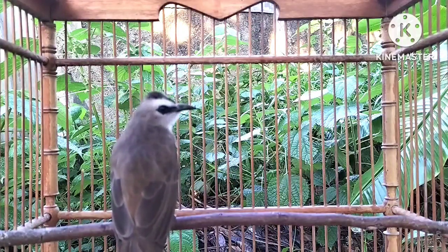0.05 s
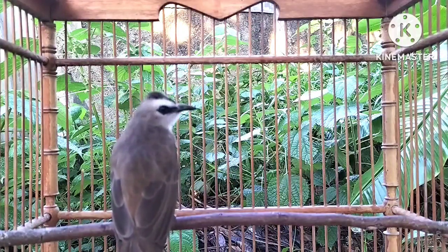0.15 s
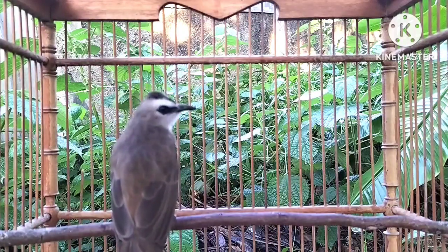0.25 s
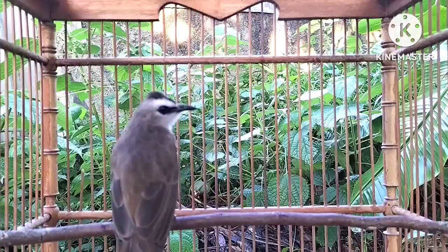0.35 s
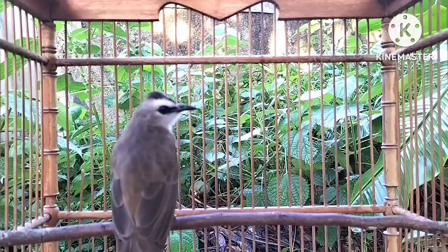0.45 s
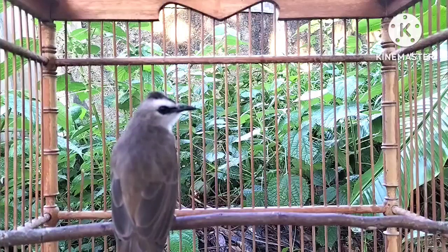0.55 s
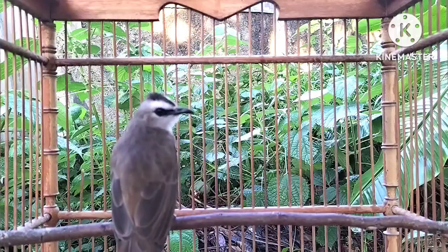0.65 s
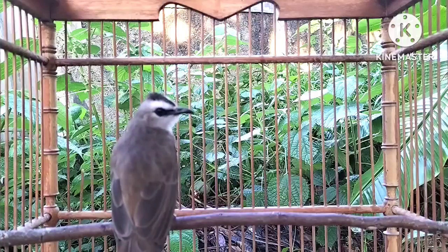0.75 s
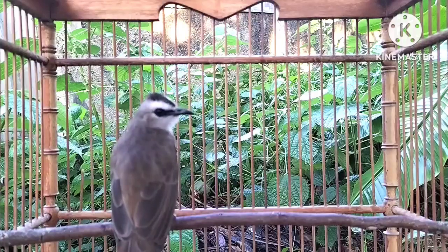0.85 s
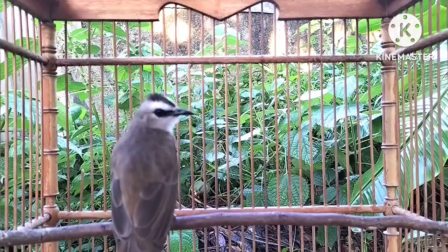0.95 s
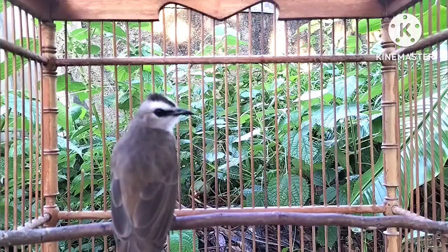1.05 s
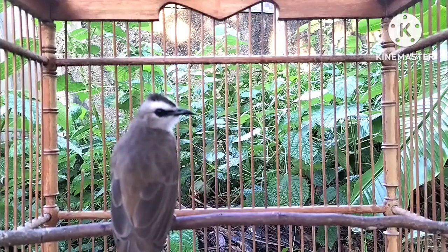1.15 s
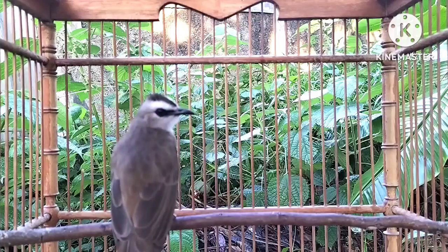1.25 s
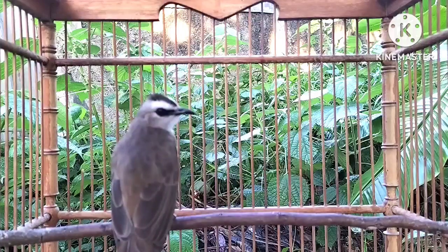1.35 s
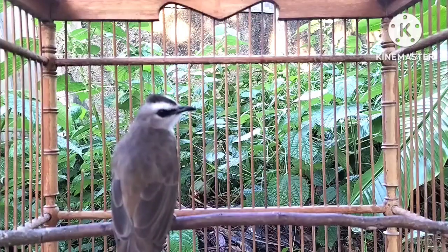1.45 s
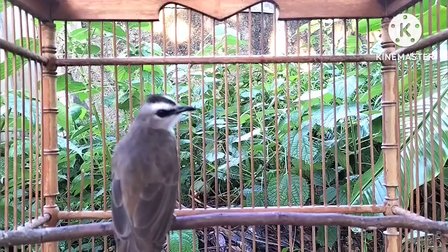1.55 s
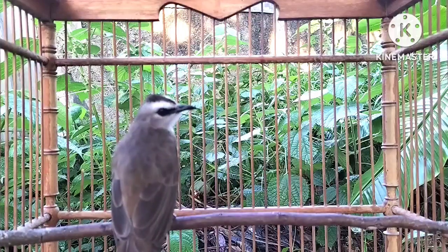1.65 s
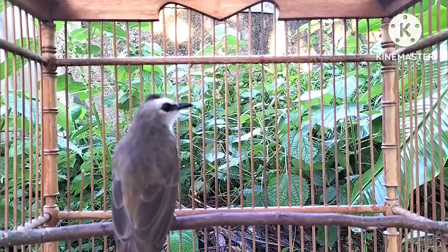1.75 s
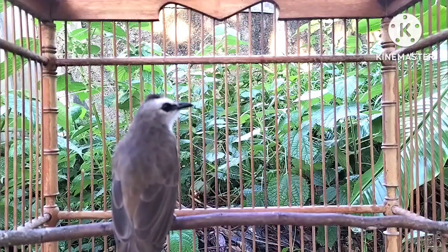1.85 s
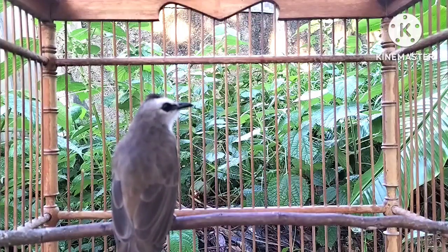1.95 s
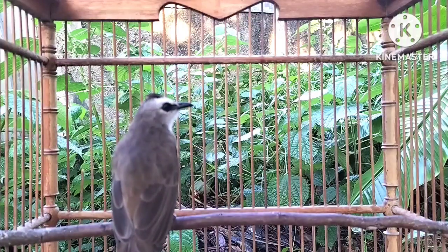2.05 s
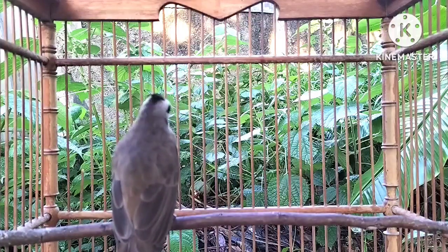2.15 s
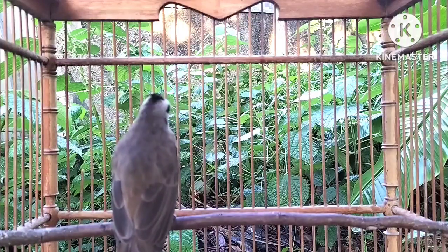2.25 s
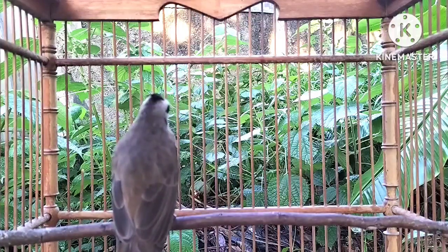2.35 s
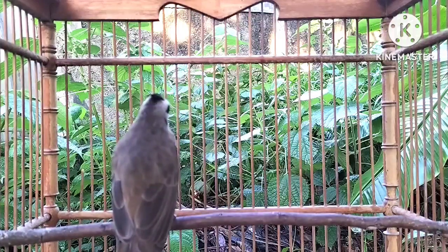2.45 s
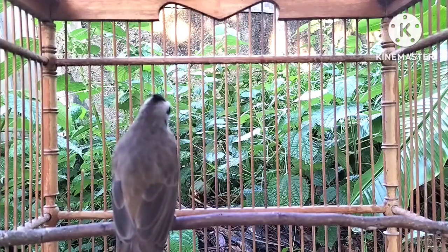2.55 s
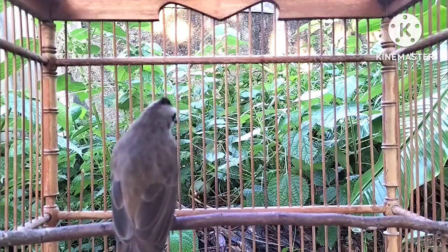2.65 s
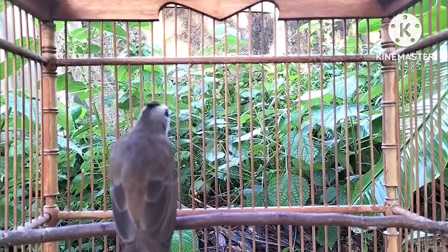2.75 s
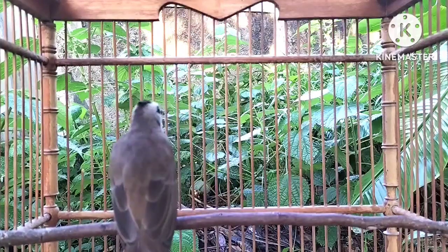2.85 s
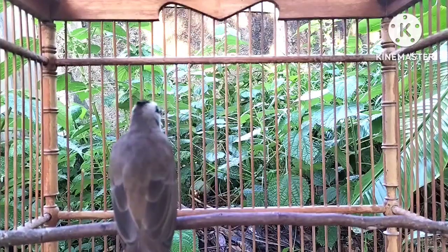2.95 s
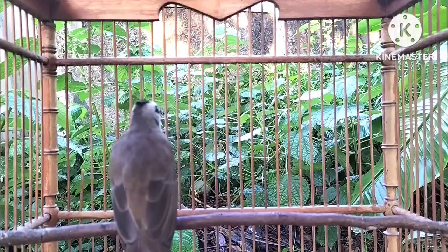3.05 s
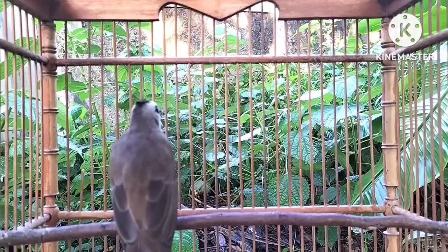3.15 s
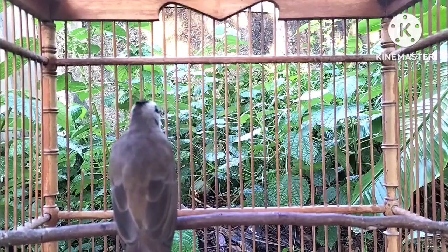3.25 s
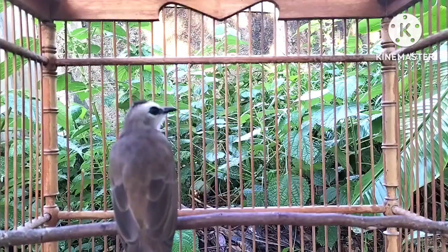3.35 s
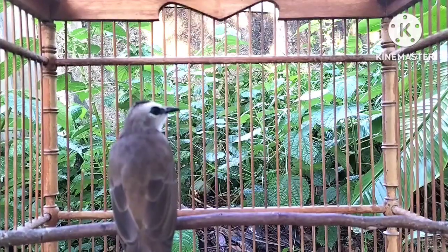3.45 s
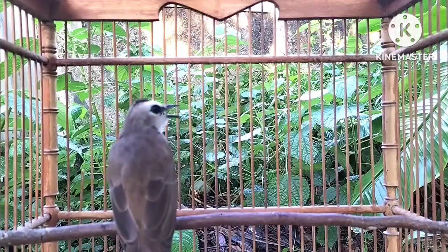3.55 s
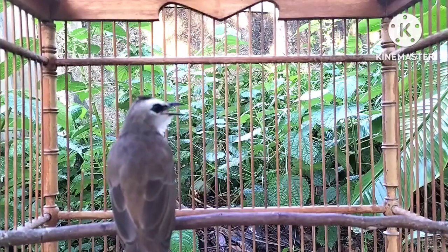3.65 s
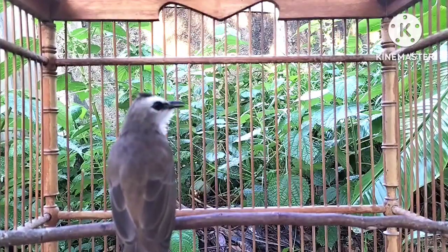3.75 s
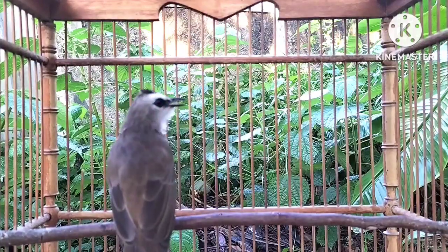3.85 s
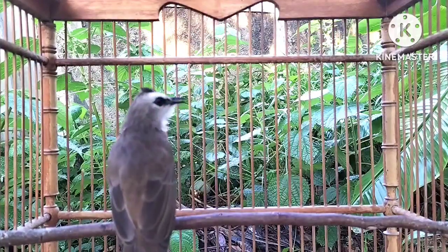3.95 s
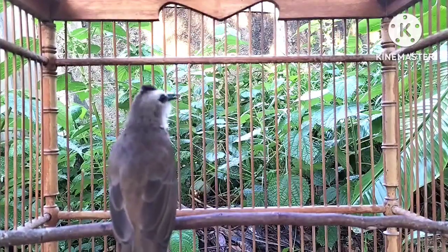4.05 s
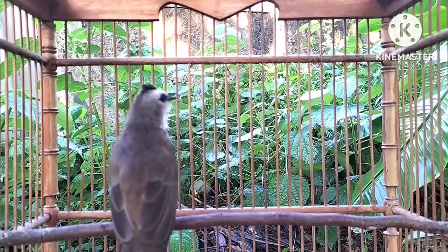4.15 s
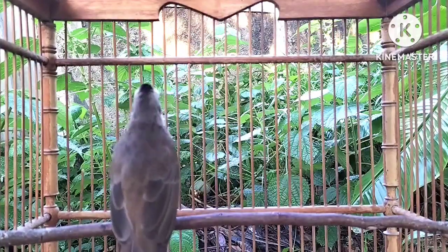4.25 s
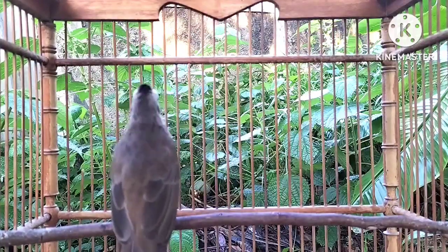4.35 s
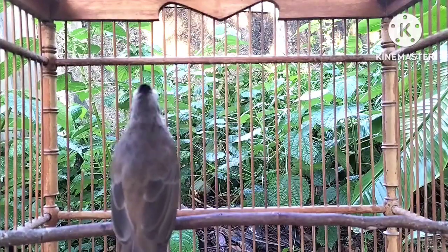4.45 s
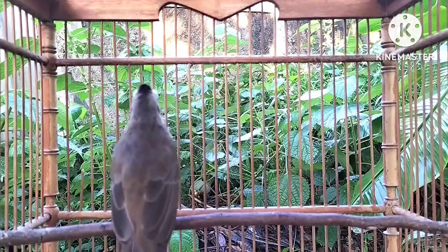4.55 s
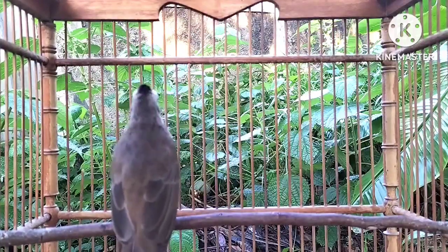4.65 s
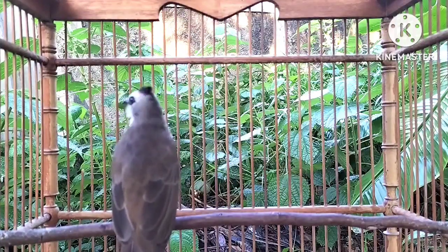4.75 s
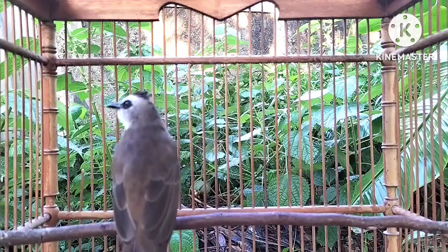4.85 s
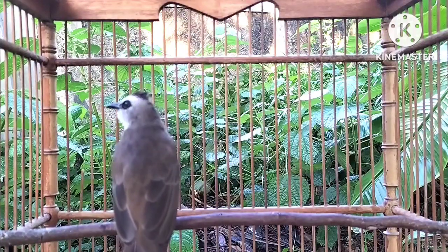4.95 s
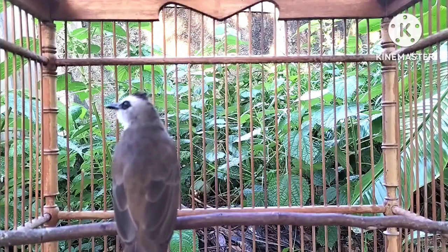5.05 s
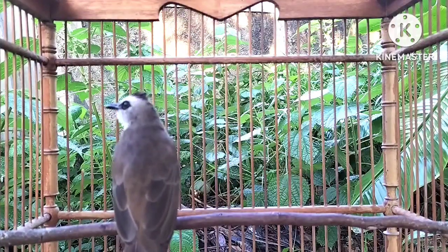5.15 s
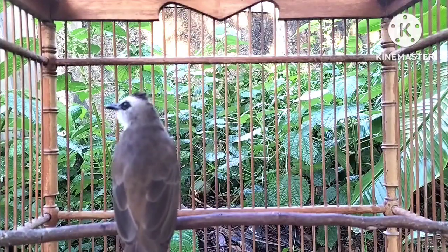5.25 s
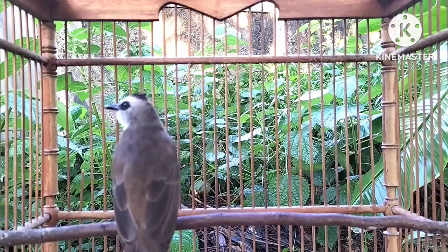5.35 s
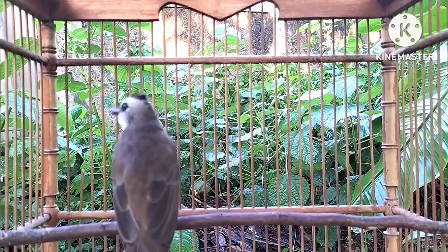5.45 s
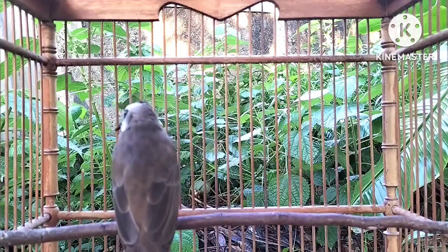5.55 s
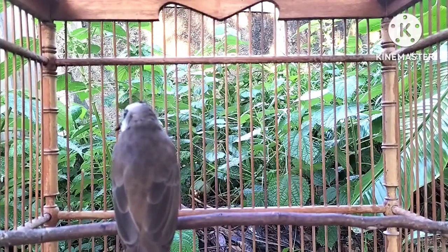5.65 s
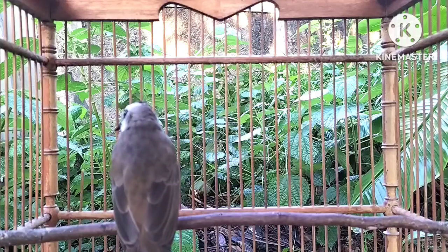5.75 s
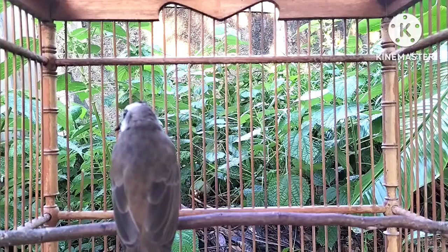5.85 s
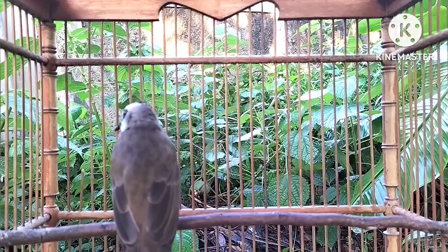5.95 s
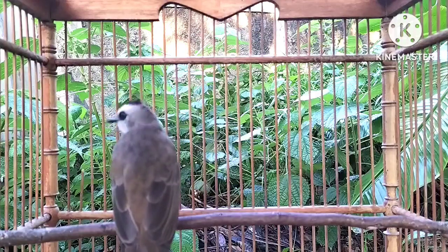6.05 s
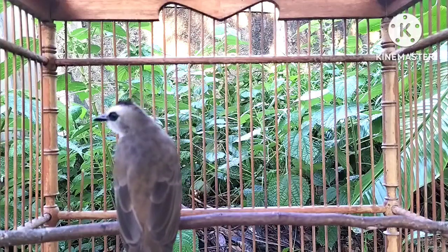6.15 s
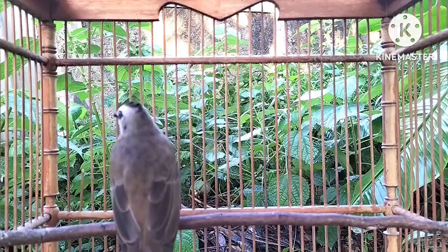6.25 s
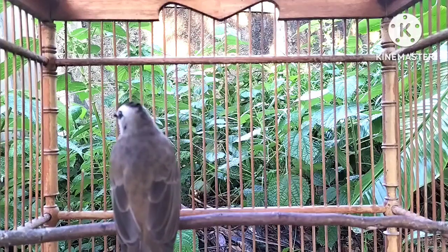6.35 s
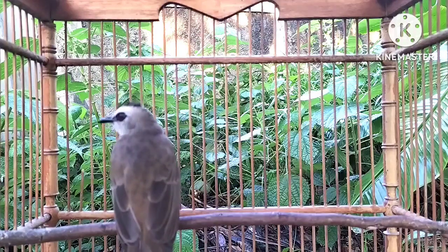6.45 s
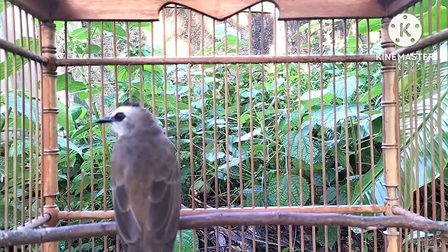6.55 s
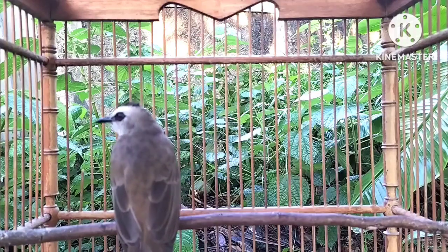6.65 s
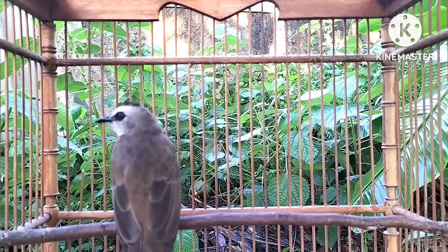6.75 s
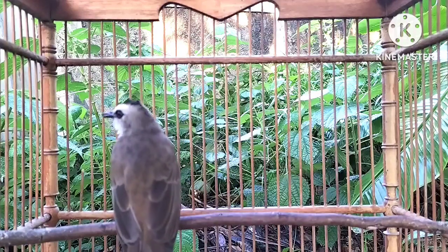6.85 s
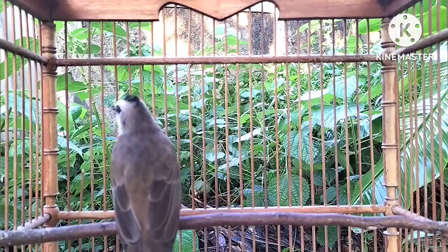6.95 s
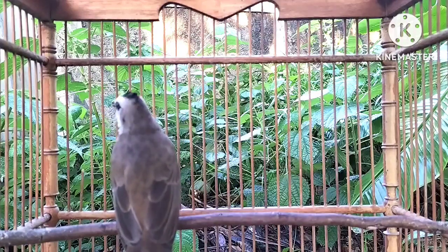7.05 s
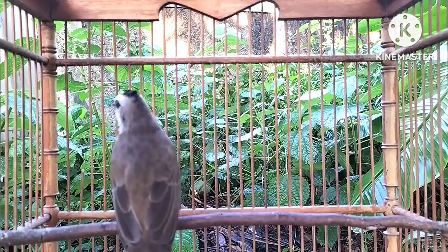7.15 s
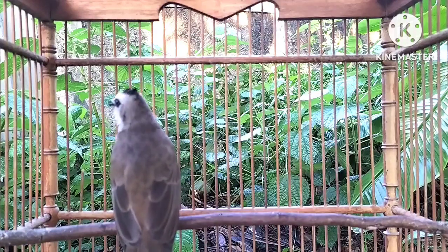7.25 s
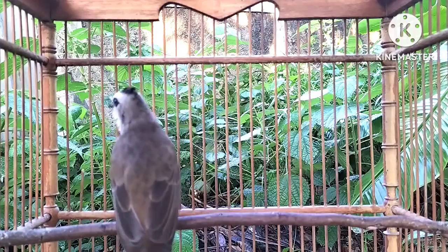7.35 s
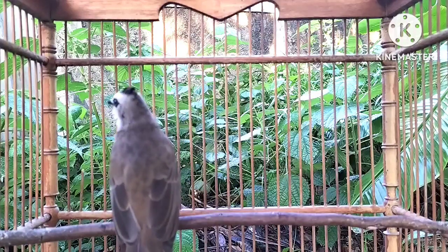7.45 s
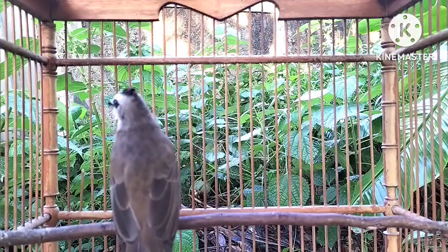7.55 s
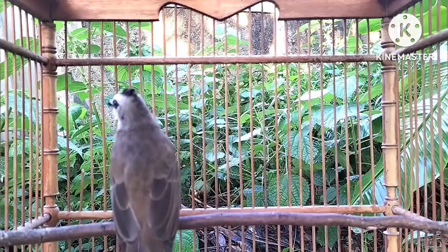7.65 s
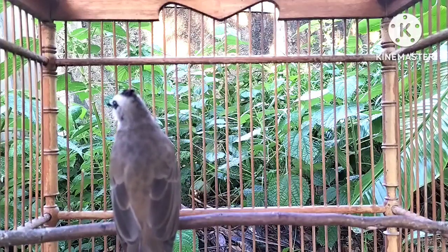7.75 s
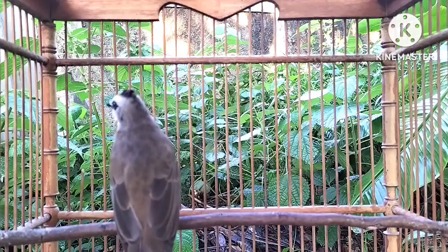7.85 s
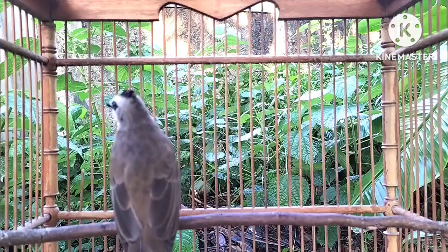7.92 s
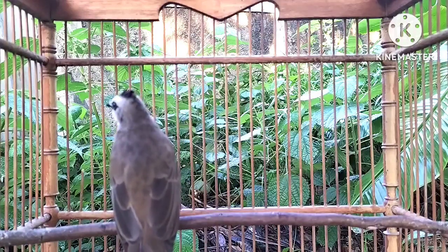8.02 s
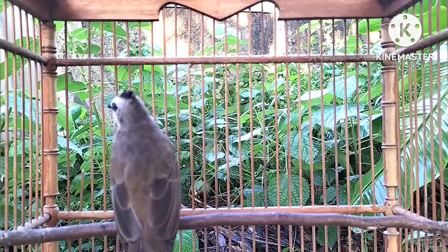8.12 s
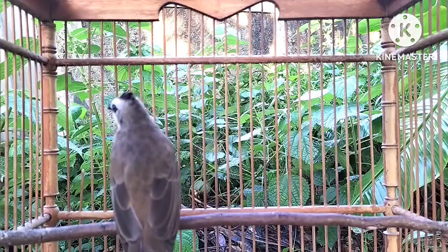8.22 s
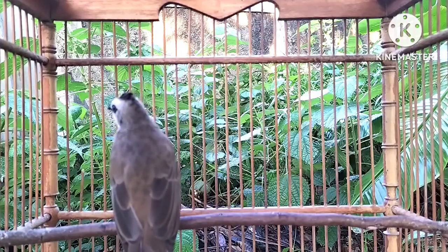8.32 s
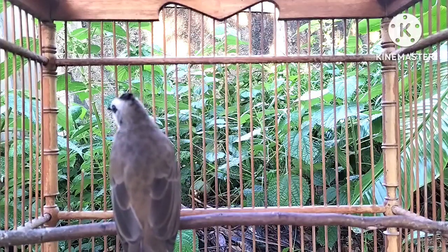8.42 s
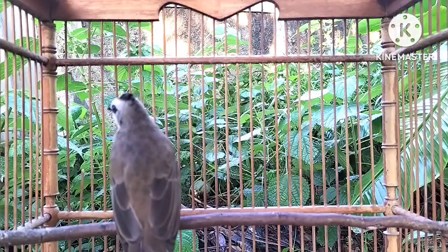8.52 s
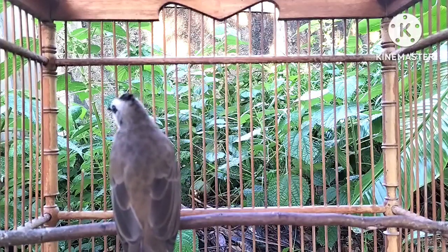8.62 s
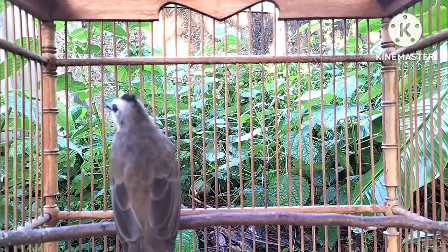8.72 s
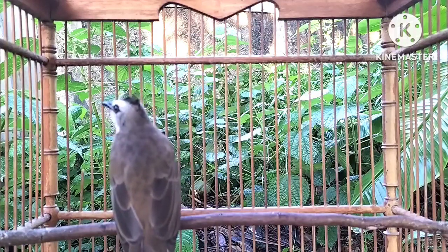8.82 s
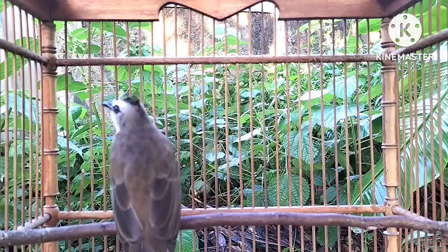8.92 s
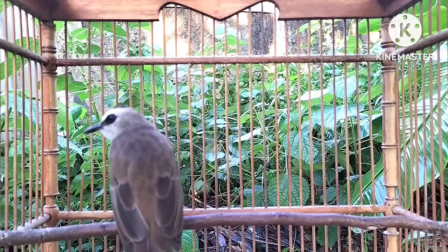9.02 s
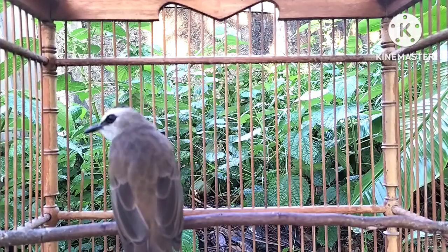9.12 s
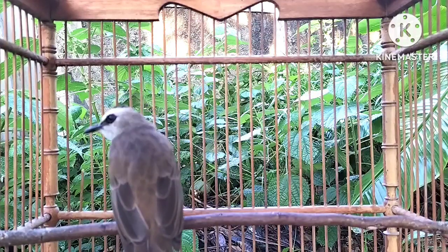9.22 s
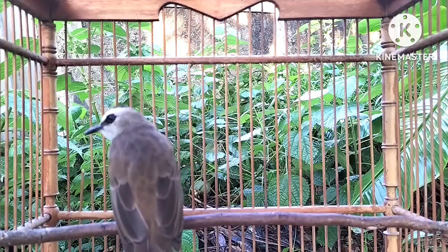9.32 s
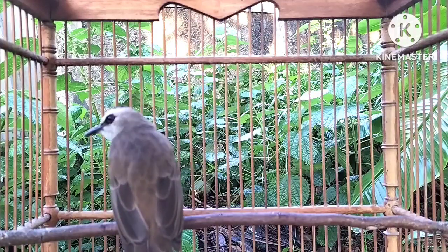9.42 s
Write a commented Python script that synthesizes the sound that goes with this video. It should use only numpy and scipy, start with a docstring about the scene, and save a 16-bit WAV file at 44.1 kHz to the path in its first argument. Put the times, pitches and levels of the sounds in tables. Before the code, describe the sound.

Far bird repeats rising whistles over crickets and an idling engine; after a brief silence, a close caged songbird sings two loud clipped phrases.

```python
"""First a far bird repeats rising whistles, gliding tones with echoes; bursts of resonant noise tick.
Crickets pulse throughout over filtered noise for traffic rumble and air; a wavering sine is an idling engine.
An edit near 2.8 s fades this part to silence and a second part in, without engine or whistle series.
There a caged songbird close by sings two phrases of short notes, overtones in a throat resonance, that overload
the input. Leaves hiss around them; buzzing chirps and one clear arched whistle come near the end."""
import sys
import numpy as np
from scipy import signal
from scipy.fft import rfft, irfft, next_fast_len
from scipy.io import wavfile
from scipy.ndimage import uniform_filter1d, map_coordinates

SR = 44100
rng = np.random.default_rng(int(sys.argv[2]) if len(sys.argv) > 2 else 0)


def inscribe(sig):
    """Save sig as 16-bit PCM at rate SR to the path in sys.argv[1].

    A 1-D sig is mono; a 2-D sig holds one channel per row.
    Samples are clipped to [-1, 1] before scaling.
    """
    pcm = np.round(np.clip(np.atleast_2d(sig).T, -1, 1) * 32767)
    wavfile.write(sys.argv[1], SR, pcm.astype(np.int16))


def undo_db(level):
    """Turn decibels back into plain size, where 20 dB means ten times bigger."""
    steps = np.asarray(level, float) / 20
    return 10 ** steps


N = 418068
TIME = np.arange(N) / SR
CUT_S = 2.87  # where the second part takes over


def unit(x):
    """Scale to rms 1."""
    return x / np.sqrt(np.mean(x ** 2) + 1e-20)


def along(points, hz):
    """Read a curve of (Hz, value) points on a log frequency axis."""
    f, v = np.transpose(points)
    return np.interp(np.log(hz + 1), np.log(f + 1), v)


def wobble(rate, size=N):
    """A smooth random curve, rate knots a second."""
    knots = rng.standard_normal(int(size * rate / SR) + 4)
    return map_coordinates(knots, [np.arange(size) * rate / SR])


def filtered(x, response):
    """Filter x by a complex response of frequency."""
    m = next_fast_len(len(x) + 8192)
    return irfft(rfft(x, m) * response(np.fft.rfftfreq(m, 1 / SR)), m)[:len(x)]


def peak(hz, centre_hz, width_hz):
    """Response of one causal resonance."""
    return 1j * hz * width_hz / (centre_hz ** 2 - hz ** 2 + 1j * hz * width_hz)


def rush(spectrum, patchy_db):
    """Coloured noise of rms 1 with patches of random gain."""
    z = signal.stft(rng.standard_normal(N), nperseg=512)[2]
    field = uniform_filter1d(rng.standard_normal(z.shape), 6, 0)
    field = uniform_filter1d(field, 14, 1)
    noise = signal.istft(z * undo_db(patchy_db * unit(field)), nperseg=512)[1][:N]
    closed = [(spectrum[0][0] * .8, -90), *spectrum, (spectrum[-1][0] * 1.2, -90)]
    return unit(filtered(noise, lambda hz: undo_db(along(closed, hz))))


def add(track, s, sound):
    """Mix a sound into a track at s seconds."""
    i = round(s * SR)
    piece = sound[max(-i, 0):][:N - max(i, 0)]
    track[max(i, 0):][:len(piece)] += piece


# How long the yard echoes. Each row: frequency in Hz, time to fall by 60 dB in seconds.
YARD_DECAY = [(1000, 0.33), (2500, 0.29), (5000, 0.071), (10000, 0.17)]


def echoes(size):
    """A fresh noise tail of energy 1; each frequency dies at its own speed."""
    hz, t, z = signal.stft(rng.standard_normal(size), SR, nperseg=256)
    decay = undo_db(-60 * t / along(YARD_DECAY, hz)[:, None])
    tail = signal.istft(z * decay, SR, nperseg=256)[1]
    return tail / np.linalg.norm(tail)


def in_yard(sound, wet_db, near_db, near_s):
    """The direct sound, quick answers of things nearby and the longer echoes of the yard."""
    tail = undo_db(wet_db) * echoes(size=SR // 2)
    near = rng.standard_normal(len(tail)) * undo_db(-60 * np.arange(len(tail)) / (near_s * SR))
    tail += undo_db(near_db) * near / np.linalg.norm(near)
    return signal.fftconvolve(sound, np.r_[1, np.zeros(SR // 200), tail])


# The caged bird's song, one list of points for each note.
# Each row: time in seconds, pitch in Hz, level of the voice in dB before its onset is thinned.
NOTES = [
    [(3.744, 1198, -41.5), (3.752, 1609, -25.5), (3.757, 1880, -12), (3.762, 1537, -24), (3.768, 1230, -7),
     (3.771, 1059, -21), (3.774, 900, -13.5)],
    [(3.825, 900, -45), (3.838, 1002, -25), (3.843, 1200, -8.5), (3.846, 1388, -10.5), (3.851, 1660, -5),
     (3.858, 1420, -6), (3.863, 1110, -0.5), (3.868, 896, -12.5)],
    [(3.999, 2500, -30), (4.012, 2740, -20.5), (4.018, 2274, -12.5), (4.022, 2840, 4.5), (4.031, 2721, 4),
     (4.034, 2369, -0.5), (4.041, 2304, 5), (4.045, 2057, -7.5)],
    [(4.152, 2630, -47.5), (4.168, 2600, -31.5), (4.175, 2353, -20), (4.178, 2077, -0.5), (4.18, 2285, -18),
     (4.183, 2900, 4), (4.186, 2821, 3.5), (4.188, 2357, 7), (4.202, 2148, 1.5), (4.208, 2045, -7)],
    [(4.339, 2289, -34), (4.352, 2870, -6.5), (4.355, 3612, -15.5), (4.358, 2523, 1.5), (4.361, 2099, -0.5),
     (4.364, 2834, 4.5), (4.368, 2392, 7.5), (4.381, 2220, 3.5), (4.385, 2046, -2.5)],
    [(7.082, 1880, -37.5), (7.094, 1891, -29), (7.107, 1761, -11.5), (7.115, 1872, -10), (7.123, 1922, -5),
     (7.132, 1747, -19.5), (7.136, 1760, -10)],
    [(7.204, 1401, -42), (7.214, 1424, -21), (7.221, 1420, -16), (7.223, 1790, -17.5), (7.228, 1907, -4.5),
     (7.246, 1960, -6.5)],
    [(7.352, 2927, -37.5), (7.37, 2973, -24.5), (7.378, 2250, 1.5), (7.384, 2090, 4.5), (7.394, 2078, 3.5),
     (7.398, 2065, -11)],
    [(7.505, 2900, -51), (7.53, 2896, -39.5), (7.541, 3168, -18), (7.545, 2126, 4), (7.547, 1951, -12),
     (7.55, 2357, 7.5), (7.556, 2250, 7), (7.566, 2110, 2.5), (7.57, 2049, -3.5)],
]
# The colour of each note.
# Each row: throat resonance at the start in Hz, at the end in Hz, gain of the half-pitch lines in dB
# while the note starts, their gain in dB once it is settled, loss in dB for each step of one pitch.
NOTE_COLOURS = [(3700, 3550, -33, -27, 3.5), (3300, 3330, -31, -28, 4), (2800, 2300, -16.5, -10.5, 4),
                (2400, 2800, -7.5, -18, 0.5), (2700, 2280, -13.5, -20.5, 6), (2800, 2470, -3, -20, 5.5),
                (2550, 2370, -5, -22.5, 1), (2700, 2400, -8, -24.5, 12), (2700, 1800, -6, -20.5, 8)]
# Every note ends alike: time in seconds, loss in dB, share of the pitch lost
RELEASE_S, RELEASE_DB, RELEASE_SAG = .0045, 21, .035
NOISE_DB = -33  # noise under the settled tone, against the voice


def songbird():
    """Overtones of the voice pass a moving throat resonance; uneven cycles add lines at half pitch."""
    out, order = np.zeros(N), np.arange(1, 15)[:, None] / 2
    for note, (first_hz, last_hz, rough_db, settled_db, loss_db) in zip(NOTES, NOTE_COLOURS):
        end_s, end_hz, end_db = note[-1]
        release = (end_s + RELEASE_S, end_hz * (1 - RELEASE_SAG), end_db - RELEASE_DB)
        s, *cols = np.transpose([*note, release])
        t = np.arange(s[0], s[-1], 1 / SR)
        pitch, db = (uniform_filter1d(np.interp(t, s, c), size=40) for c in cols)
        throat = np.linspace(first_hz, last_hz, len(t))
        # noise leads each note: onset is 1 early, 0 once near full level
        onset = np.clip((db.max() - 6.0 - np.maximum.accumulate(db)) / 14, 0, 1)

        hz = order * pitch
        gains = np.abs(peak(hz, throat, 900)) ** 1.6 * undo_db(-loss_db * order)
        # little leaves the beak at either end of the spectrum
        gains = gains / (1 + (hz / 4600) ** 5) / (1 + (950 / hz) ** 4)
        roughness = np.clip(1.8 * onset, 0, 1)
        gains[::2] *= undo_db(settled_db + (rough_db - settled_db) * roughness)
        gains *= undo_db(db) / np.linalg.norm(gains, axis=0)
        phase = order * 2 * np.pi * np.cumsum(pitch) / SR + order ** 2
        voice = np.sum(gains * np.sin(phase), axis=0)
        voice *= 1 - .6 * onset

        def noise_colour(f):
            broad = 0.24 * f ** 6 / (f ** 6 + 1400 ** 6) / (1 + (f / 4500) ** 4)
            return np.exp(-((f - throat.mean()) / 900) ** 2) + broad

        noise = unit(filtered(rng.standard_normal(len(t)), noise_colour))
        flutter_db = 5.6 * np.tanh(wobble(300, size=len(t)))
        noise *= undo_db(db + NOISE_DB + 31 * onset + flutter_db)
        sung = (voice + noise) * signal.windows.tukey(len(t), .12)
        add(out, s[0], in_yard(sung, wet_db=-27, near_db=-16, near_s=.09))
    return out


# A far bird's series of rising whistles.
# Each row: start in seconds, length in seconds, first pitch in Hz, level in dB about which it flutters.
WHISTLES = [(-.05, 0.089, 2650, -49), (0.081, .12, 2694, -53), (0.243, .11, 2700, -52),
            (0.39, 0.13, 2715, -51.5), (0.545, 0.11, 2610, -50.5), (0.707, .12, 2694, -51.5),
            (0.864, 0.12, 2580, -53.5), (1.037, 0.11, 2690, -53.5), (1.195, 0.14, 2545, -53),
            (1.354, .2, 2510, -51.5), (1.619, 0.19, 2400, -50.5), (1.886, .17, 2450, -48),
            (2.14, .17, 2340, -49.5), (2.393, 0.19, 2400, -51.5), (2.665, .17, 2357, -53)]
# All whistles climb to one pitch; share of the length spent climbing; fall after the top
SERIES_TOP_HZ, SERIES_GLIDE, DROOP_HZ = 3117, .72, 138
# Single short calls; the one at 3.737 s leads into the caged bird's first note.
# Each row: start in seconds, length in seconds, first pitch in Hz, last pitch in Hz,
# level in dB about which it flutters.
SINGLE_CALLS = [(.01, 0.063, 2210, 2400, -59), (0.088, 0.069, 3960, 4230, -64),
                (0.332, 0.053, 1870, 2000, -64), (.888, 0.048, 1800, 1780, -62),
                (0.962, 0.34, 4280, 4500, -71), (2.41, 0.13, 4400, 4090, -68),
                (0.577, .035, 2400, 2420, -61), (1.11, 0.049, 2400, 2400, -56.5),
                (1.464, 0.076, 4000, 4500, -65), (1.936, 0.22, 4050, 4420, -67),
                (2.146, 0.041, 1100, 1098, -55.5), (3.159, 0.23, 1606, 1575, -68.5),
                (3.299, 0.22, 1379, 1307, -60), (3.737, .014, 4830, 5050, -43),
                (7.563, 0.063, 3980, 3720, -43), (7.883, 0.074, 1338, 1297, -61),
                (8.448, .03, 2200, 2220, -59.5), (8.858, 0.021, 3570, 3540, -58),
                (8.926, .09, 3860, 3445, -52.5), (9.035, 0.042, 4670, 4310, -64.5)]
CALL_GLIDE = 0.75  # share of a rising call spent gliding
# One clear arched whistle, a single row: start in seconds, length in seconds, first pitch in Hz,
# top pitch in Hz, level in dB, share of the length spent climbing, fall after the top in Hz.
ARCHED_WHISTLE = (8.8, .15, 4050, 4755, -42.5, 0.38, 150)
# Faint chirps at random in the first part; the spread of pitch is in log units
CHATTER, CHATTER_S, CHATTER_DB, CHATTER_HZ, CHATTER_SPREAD = 14, 0.048, -69, 4500, .14


def whistles_and_calls():
    """Fluttering glides with strong echoes; in the whistle series these outweigh the direct sound."""
    out = np.zeros(N)
    chatter = []
    when, draws = rng.uniform(0, CUT_S, CHATTER), rng.standard_normal((CHATTER, 2))
    for s, (a, b) in zip(when, draws):
        first_hz = CHATTER_HZ * np.exp(CHATTER_SPREAD * a)
        last_hz = CHATTER_HZ * np.exp(CHATTER_SPREAD * (a + .4 * b))
        chatter.append((s, CHATTER_S, first_hz, last_hz, CHATTER_DB))
    rows = [(s, length, hz, SERIES_TOP_HZ, db, SERIES_GLIDE, DROOP_HZ, True)
            for s, length, hz, db in WHISTLES]
    rows += [(*call, CALL_GLIDE, 0, False) for call in SINGLE_CALLS + chatter]
    rows += [(*ARCHED_WHISTLE, False)]
    for s, length, first_hz, last_hz, db, share, droop_hz, walled in rows:
        u = np.arange(round(length * SR)) / (length * SR)
        # the series lingers on its first pitch
        glide = np.sin(np.pi / 2 * np.clip(u / share, 0, 1)) ** (2 if walled else 1)
        if last_hz < first_hz:  # falling notes slide evenly
            glide = u
        droop = droop_hz * np.clip((u - share) / (1 - share), 0, 1) ** 1.5
        hz = first_hz + (last_hz - first_hz) * glide - droop
        hz = hz + (33 if walled else 12) * wobble(150, size=len(u))
        tone = np.sin(2 * np.pi * np.cumsum(hz) / SR)
        tone *= undo_db(db + 4.0 * np.tanh(wobble(130, size=len(u)))) * np.sin(np.pi * u) ** 0.51
        far_db = 5 if walled else -3.5  # the bird of the series sits farther off
        if walled:  # a wall behind it repeats each whistle
            gap = np.zeros(SR // 21)
            tone = np.r_[tone, gap] + undo_db(-8.5) * np.r_[gap, tone]
        add(out, s, in_yard(tone, wet_db=far_db - 6, near_db=far_db, near_s=.14))
    return out


# Clear ticks, some just ahead of the songbird's notes.
# Each row: time in seconds, peak of the direct sound in dB, centre of the resonance in Hz.
CLEAR_TICKS = [(.5296, -36.5, 6350), (.6519, -28, 5070), (.661, -37, 5470), (.9572, -30, 4500),
               (1.0735, -42, 5940), (1.2045, -33, 3360), (1.3497, -38, 5700), (1.3798, -28.5, 3730),
               (1.4822, -37.5, 1350), (1.6224, -25, 5130), (1.6914, -32, 1530), (1.7336, -36, 6440),
               (1.84, -33.5, 3630), (1.934, -43, 4050), (2.0394, -36.5, 3940), (2.1058, -26.5, 5420),
               (2.1668, -39, 4360), (3.003, -48, 1860), (5.2499, -39.5, 1440), (5.332, -41, 2800),
               (6.2554, -35, 5200), (6.8295, -46.5, 2700), (7.066, -43, 2300), (7.0797, -39, 2400),
               (7.197, -40, 2400), (7.3105, -28.5, 5200), (7.339, -21, 3120), (7.6802, -43, 5100),
               (7.7165, -41, 2360), (7.775, -33.5, 1500), (8.1316, -46.5, 3974), (8.6488, -38, 4800)]
# Fainter ticks scattered at random; the spread of the centre is in log units
FAINT_TICKS, FAINT_DB, FAINT_SCATTER_DB, FAINT_HZ, FAINT_SPREAD = 24, -54, 3, 3560, .4


def ticks():
    """Each tick is a broad crack of dying noise, strongest near its own resonance."""
    out, t = np.zeros(N), np.arange(SR // 30) / SR
    when = rng.uniform(0, N / SR, FAINT_TICKS)
    size, tone = rng.standard_normal((FAINT_TICKS, 2)).T
    faint = zip(when, FAINT_DB + FAINT_SCATTER_DB * size, FAINT_HZ * np.exp(FAINT_SPREAD * tone))
    for s, db, hz in [*CLEAR_TICKS, *faint]:
        def ring(f):
            body = peak(f, hz, .65 * hz) ** 2 + .22 * peak(f, 1600, 1500)
            return body / (1 + (f / 7600) ** 10)

        burst = rng.standard_normal(len(t)) * undo_db(-60 * t / 0.0087)  # falls 60 dB in 8.7 ms
        crack = filtered(burst, ring)
        crack = undo_db(db) * crack / np.abs(crack).max()
        add(out, s, in_yard(crack, wet_db=-18, near_db=-14, near_s=.04))
    return out


# Hisses of leaves and buzzing chirps. Each row: start in seconds, length in seconds, centre in Hz,
# distance in Hz from the centre to where the band has dropped to 1/e, level in dB before the swell.
HISS_BURSTS = [(3.006, 0.34, 8700, 2000, -69), (6.151, 0.22, 4460, 2850, -54),
               (8.735, 0.028, 4990, 1497, -61.5), (9.136, 0.12, 7170, 300, -53.5),
               (9.371, 0.12, 7120, 300, -52.5)]


def hisses():
    """Short swelling bursts of fluttering band noise."""
    out = np.zeros(N)
    for s, length, hz, width_hz, db in HISS_BURSTS:
        u = np.arange(round(length * SR)) / (length * SR)
        noise = filtered(rng.standard_normal(len(u)), lambda f: np.exp(-((f - hz) / width_hz) ** 2))
        flutter = undo_db(db + 3.55 * wobble(60.3, size=len(u)))
        add(out, s, flutter * np.sin(np.pi * u ** 0.93) * unit(noise))
    return out


# The near cricket's runs of pulses.
# Each row: first pulse in seconds, last pulse in seconds, level in dB about which the pulses vary.
CRICKET_RUNS = [(0.04, 0.641, -56), (0.887, 1.429, -54), (1.673, 2.452, -53), (2.694, 2.756, -51.5),
                (3.008, 3.059, -54), (3.175, 6.133, -57), (6.454, 8.64, -58), (8.88, 9.173, -57.5),
                (9.256, 9.379, -52)]
PULSE_S = .0595  # approximate time from pulse to pulse
# A very high insect hiss. Each row: from in seconds, to in seconds, level in dB about which it flutters.
HIGH_HISS = [(0, 2.75, -79.5), (6.45, 9.48, -84)]


def insects():
    """A near cricket pulses in runs; a far one holds a wavering tone; a third hisses very high."""
    gate, u = np.zeros(N), np.arange(round(.032 * SR)) / (.032 * SR)
    for first, last, db in CRICKET_RUNS:
        times = np.linspace(first, last, round((last - first) / PULSE_S) + 1)
        for s, scatter in zip(times, rng.standard_normal(len(times))):
            add(gate, s - .004, undo_db(db + 1.2 * scatter) * np.sin(np.pi * u) ** .7)
    pulses = gate + .2 * np.roll(gate, SR // 50)  # each pulse has a weak repeat
    near_tone = np.sin(2 * np.pi * np.cumsum(7862 + 15 * wobble(42)) / SR)
    near = pulses * undo_db(3.6 * wobble(150)) * near_tone
    far_tone = np.sin(2 * np.pi * np.cumsum(7358 + 8 * wobble(11)) / SR)
    far = undo_db(-70.5 + 3 * wobble(25)) * far_tone * (TIME > CUT_S)
    level = sum(undo_db(db) * (TIME > a) * (TIME < b) for a, b, db in HIGH_HISS)
    hiss = rush([(14200, -6.0), (15000, 3.0), (15400, -4.0)], patchy_db=0.0)
    return near + far + level * undo_db(3 * wobble(18)) * hiss


# The idling engine. Each row: time in seconds, pitch in Hz, rms level in dB, both before they waver.
ENGINE_IDLE = [(0.0, 55.7, -60), (0.26, 71.46, -48.5), (2.75, 76.06, -47)]
# Colour of the traffic rumble, one list for each part. Each row: frequency in Hz, relative level in dB.
RUMBLE_COLOUR = [
    [(12, -60), (20, -27), (70, -4), (103, -10), (167, -7.5), (194, -10.5), (275, -15), (404, -20.5),
     (2000, -41), (2600, -38), (4400, -120)],
    [(12, -62), (20, -33.5), (34, -10.5), (113, 0.5), (374, -11.5), (540, -21), (857, -25.5), (1330, -32),
     (1470, -31.5), (2000, -47), (2600, -70.5), (4400, -120)],
]
# Rms level of the rumble in dB before it wavers, one for each part.
RUMBLE_LEVELS = [-47, -48]
# Colour of the garden air. Each row: frequency in Hz, relative level in dB.
AIR_COLOUR = [(1500, -9.5), (3000, -2), (4200, -3), (5500, -10.5), (6900, -6), (7400, 6.5), (8100, 2.5),
              (8700, -9), (10800, -11.5), (11500, -23)]
# Rms level of the air in dB before it wavers, one for each part.
AIR_LEVELS = [-63.5, -66]


def garden():
    """Noise of far traffic and air, different in each part; an engine's wavering sine in the first."""
    s, hz, db = np.transpose(ENGINE_IDLE)
    throb = np.interp(TIME, s, db) + 2.0 * wobble(30.1)
    pitch = np.interp(TIME, s, hz) + 3 * wobble(2.9)
    out = np.sqrt(2) * undo_db(throb) * np.sin(2 * np.pi * np.cumsum(pitch) / SR) * (TIME < CUT_S)
    parts = [TIME < CUT_S, TIME > CUT_S]
    for part, rumble_db, spectrum, air_db in zip(parts, RUMBLE_LEVELS, RUMBLE_COLOUR, AIR_LEVELS):
        rumble = undo_db(rumble_db + 1.2 * wobble(5)) * rush(spectrum, patchy_db=1.0)
        air = undo_db(air_db + 1.4 * wobble(1.3)) * rush(AIR_COLOUR, patchy_db=2.5)
        out += part * (rumble + air)
    return out


def scene():
    """All sources, one channel."""
    return (songbird() + whistles_and_calls() + ticks() + hisses() + insects() + garden())[None]


def band_limit(x):
    """A steep low-pass at the top of the band."""
    return signal.sosfilt(signal.butter(12, 15530, fs=SR, output="sos"), x)


def record(dry):
    """The input clips a little unevenly, passes no deep bass or extreme treble, and the edit fades."""
    lean = dry + .006 * dry ** 2
    clipped = lean / (1 + np.abs(lean / 1.07) ** 12) ** (1 / 12)
    passed = filtered(clipped[0], lambda hz: 1j * hz / (40 + 1j * hz) / (1 + (hz / 16300) ** 24))[None]
    # out from 2.68 to 2.815 s, in from 2.96 to 3.007 s, on a bent ramp
    fade = np.interp(TIME, [2.68, 2.815, 2.96, 3.007], [1, 0, 0, 1]) ** 1.9
    return band_limit(passed * fade)


dry = scene()
out = record(dry)
inscribe(out)
```